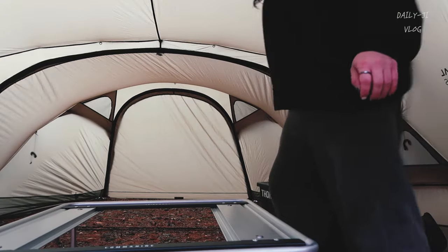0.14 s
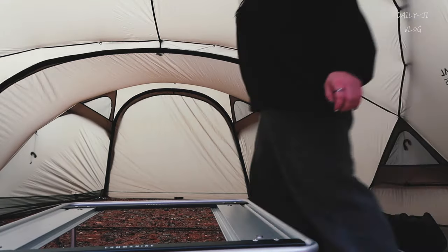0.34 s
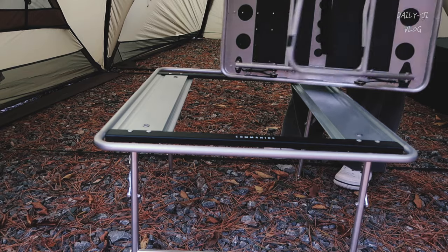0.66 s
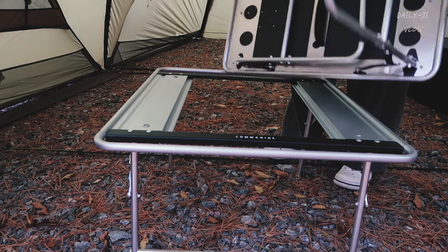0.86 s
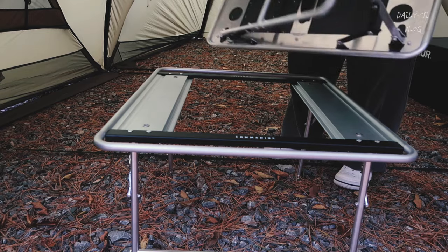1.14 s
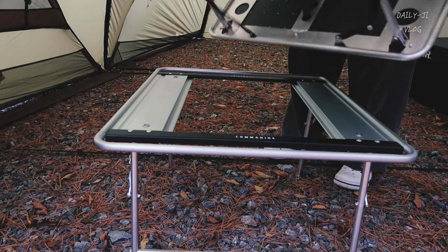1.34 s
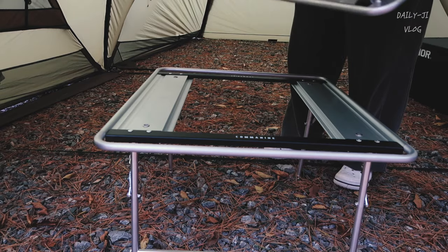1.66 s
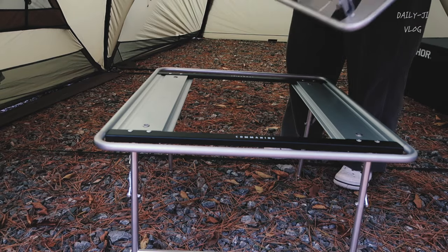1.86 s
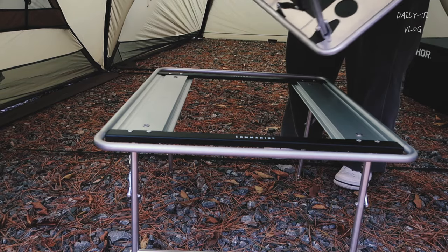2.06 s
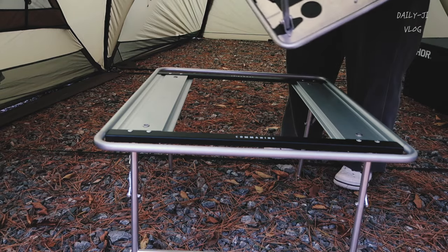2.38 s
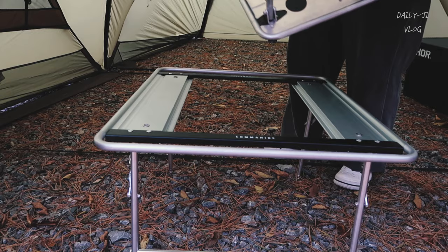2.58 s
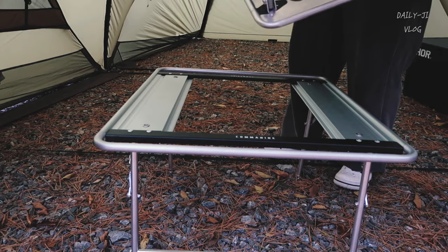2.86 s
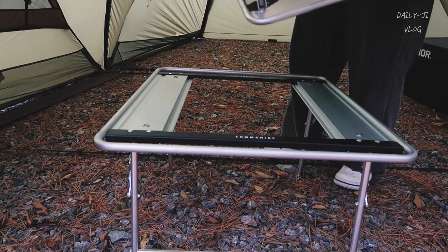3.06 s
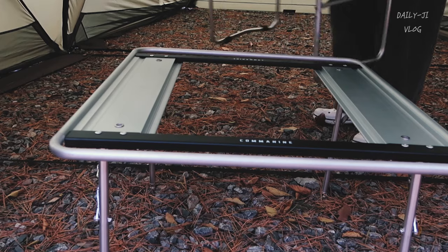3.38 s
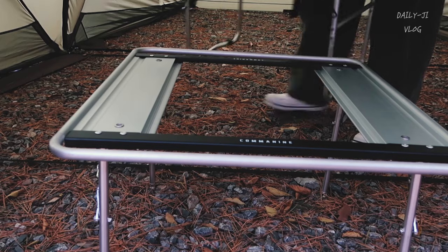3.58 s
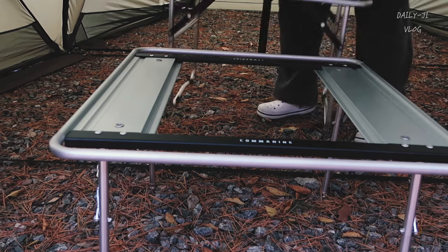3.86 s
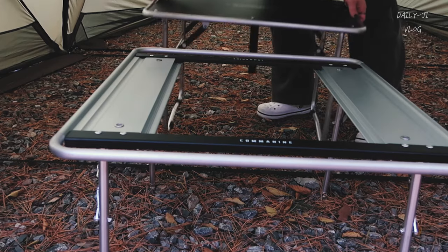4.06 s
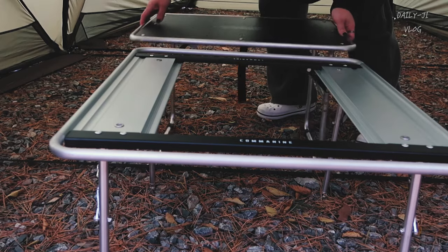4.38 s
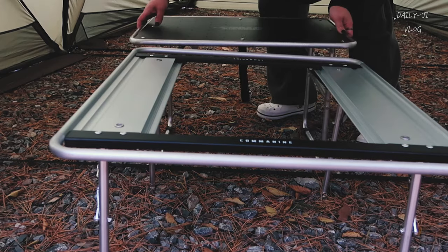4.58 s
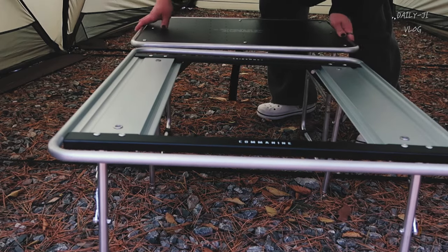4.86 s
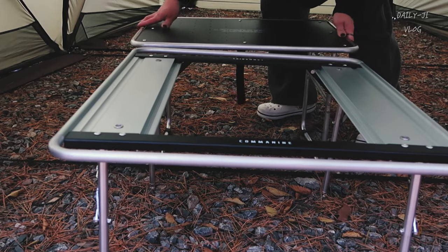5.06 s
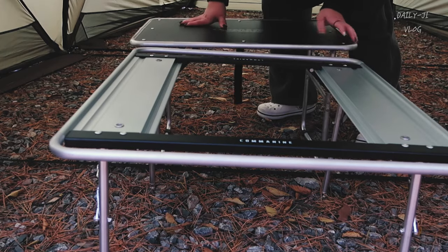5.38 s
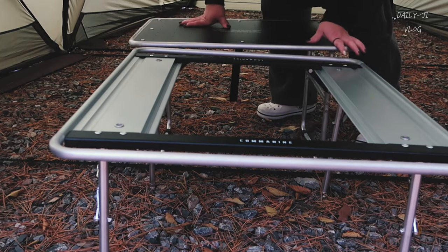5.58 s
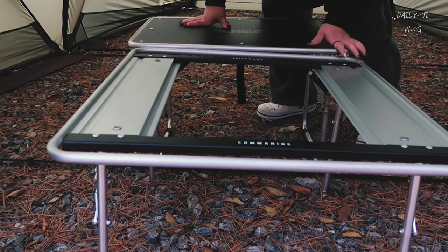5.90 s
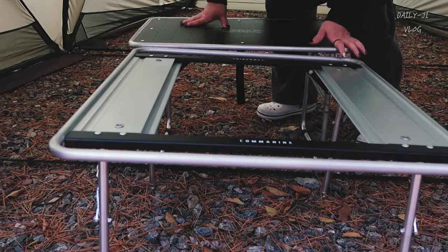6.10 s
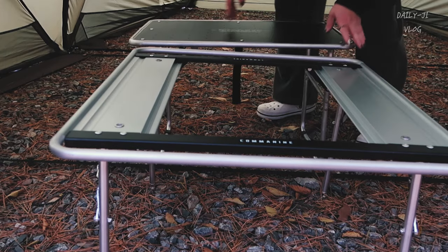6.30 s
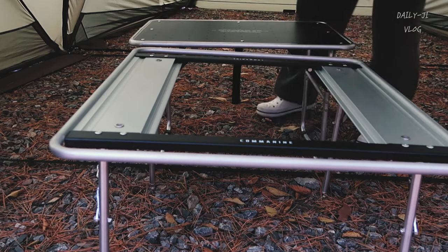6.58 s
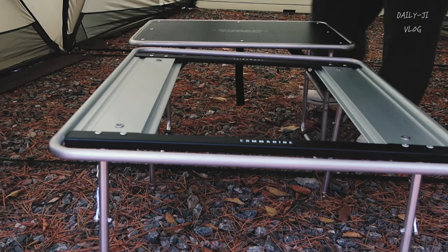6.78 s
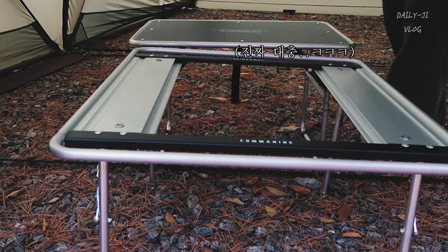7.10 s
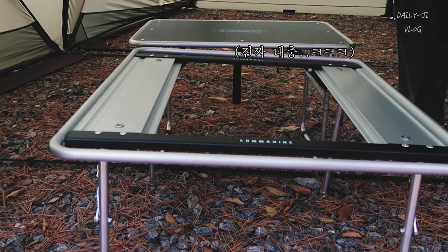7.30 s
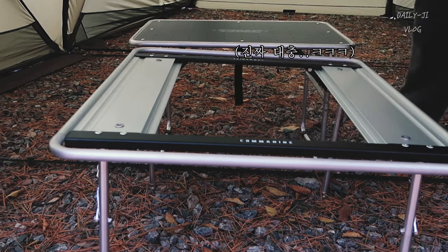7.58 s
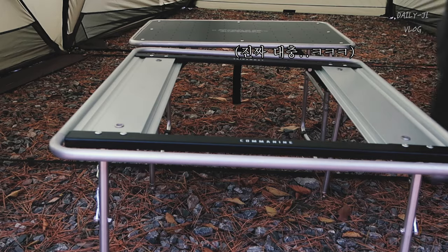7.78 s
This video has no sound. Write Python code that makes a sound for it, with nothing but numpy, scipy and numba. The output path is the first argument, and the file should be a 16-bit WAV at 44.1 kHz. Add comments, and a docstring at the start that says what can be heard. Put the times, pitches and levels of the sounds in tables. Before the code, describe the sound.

A folding aluminium table is set up on gravel inside a tent, close to the microphone, with very little echo. A distant stream rushes softly throughout, and a very faint insect ticks until about 4 seconds. From 0.3 seconds the legs click and clack, and a brace scrapes along its track around 1 second. At 1.5 seconds comes the loudest knock, a rattling metal clack with a low thump, after which everything briefly dips in volume. Following a quieter stretch, shoes and table feet crunch the stones from 3 to 4 seconds among lighter knocks, with another knock near 4.9 seconds. Palms squeak across the top at 5.4 seconds, the frame clacks sharply at 5.9, and a second squeak follows at 6.3. Softer knocks and gravel crunches continue until nearly 8 seconds.

```python
"""A folding aluminium camp table is opened and stood on gravel inside a tent, near a small camera.
A stream rushes throughout, and a far insect ticks for the first half. Legs clack and a brace slides in
its track; at 1.5 s comes the loudest knock, and the camera turns its volume down for a moment.
Shoes and table feet then crunch the stones between more knocks. Palms squeak across the top at 5.4 s,
the frame clacks sharply at 5.9 s, and another squeak, softer knocks and crunches end the scene."""
import sys
import numpy as np
from scipy import signal
from scipy.fft import rfft, irfft, next_fast_len
from scipy.io import wavfile
from scipy.ndimage import uniform_filter1d
from numba import njit

SR = 44100
rng = np.random.default_rng(int(sys.argv[2]) if len(sys.argv) > 2 else 0)


def generate_wav(signal):
    """Clip the signal to [-1, 1] and save it as 16-bit WAV at the path in sys.argv[1]."""
    frames = np.transpose(np.atleast_2d(signal))
    scaled = np.clip(frames, -1, 1) * 32767
    pcm = np.round(scaled).astype(np.int16)
    wavfile.write(sys.argv[1], SR, pcm)


N = 350138


def undb(db):
    return 10 ** (np.asarray(db) / 20)


def unit(x):
    return x / np.sqrt(np.mean(x ** 2))


def peak(x):
    return x / np.max(np.abs(x))


def curve(points, n):
    """Join (Hz, value) points into one value for each frequency of an n-sample spectrum."""
    hz, value = np.transpose(points)
    return np.interp(np.log(np.arange(n // 2 + 1) * SR / n + 1), np.log(hz), value)


@njit
def moving_filter(x, hz, width):
    """Let through the sound near a pitch that may move."""
    y, b, l = np.empty(len(x)), 0., 0.
    for i in range(len(x)):
        g, k = np.tan(np.pi * hz[i] / SR), width / hz[i]
        v = (b + g * (x[i] - l)) / (1 + g * (g + k))
        b, l, y[i] = 2 * v - b, l + 2 * g * v, k * v
    return y


def band(x, hz, width):
    return moving_filter(x, np.clip(hz + np.zeros(len(x)), 20, .45 * SR), max(1. * width, 5.))


def steep_band(x, hz, width):
    return band(band(x, hz, width), hz, width)


def drift(per_s):
    """A smooth random wobble, about 1 in size."""
    k = int(SR / per_s)
    steps = np.repeat(rng.standard_normal(N // k + 1), k)
    return 1.3 * uniform_filter1d(uniform_filter1d(steps, k), k)[:N]


def grit(per_s, spread_db):
    """Many tiny hits of unequal size."""
    size_db = spread_db * np.minimum(rng.exponential(size=N), 3)
    return unit((rng.random(N) < per_s / SR) * rng.standard_normal(N) * undb(size_db))


def swell(s, rise, hold, fall):
    """Samples and gain of a swell that is full at time s; rise and fall are seconds per 20 dB."""
    corners = s + np.array([-3 * rise, 0, hold, hold + 3 * fall])
    span = np.arange(*np.clip(corners[[0, -1]] * SR, 0, N).astype(int))
    return span, undb(np.interp(span / SR, corners, [-60, 0, 0, -60]))


def whine():
    """The camera's electronics give a faint high tone, stronger on the left."""
    # steady tones: (pitch [Hz], base level [dB])
    tones = [(13000, -83), (13025, -83)]
    t = np.arange(N) / SR
    tone = sum(undb(db) * np.sqrt(2) * np.sin(2 * np.pi * hz * t) for hz, db in tones)
    return tone * np.array([[2.6], [-.8]])


def stream(level_db=-43.5):
    """Far rushing water: smooth noise whose lows and highs swell a little, wider in the highs."""
    # the water's tone: (frequency [Hz], level [dB])
    water = [(15, -35), (25, -51), (38, -6.5), (160, 0), (198, -4), (374, -6), (654, -8), (1110, -10),
             (1200, -11.5), (1570, -12.5), (3570, -25), (5760, -36), (13100, -48), (13700, -48),
             (14300, -80)]
    # stereo width: (frequency [Hz], side over middle [dB])
    spread = [(60, -23), (110, -19.5), (200, -11), (380, -8.5), (700, -14.5), (1290, -12), (2380, -8),
              (4400, -0.5), (8120, -0.5), (15000, 10)]
    n = next_fast_len(N)
    colour_db = curve(water, n)
    gains = undb([colour_db, colour_db + curve(spread, n)])
    noise = irfft(rfft(rng.standard_normal((2, n))) * gains, n)[:, :N]
    low = signal.sosfilt(signal.butter(2, 300, fs=SR, output="sos"), noise)
    mid, side = low * undb(.27 * drift(3.14)) + (noise - low) * undb(.7 * drift(2.85))
    return undb(level_db) * np.array([mid + side, mid - side]) / np.std(mid)


def insect(start_s=.085, end_s=4.05, period_s=.12, ticks_s=(0, .013, .04, .067), hz=4180, db=-70):
    """A far insect repeats a short group of dry ticks, opposite in left and right."""
    times = (np.arange(start_s, end_s, period_s)[:, None] + ticks_s).ravel()
    clicks = np.zeros(N)
    clicks[(times * SR).astype(int)] = undb(3.8 * rng.standard_normal(len(times)))
    return undb(db) * unit(steep_band(clicks, hz, 500)) * np.array([[1], [-1]])


def crunch():
    """Gravel and metal grind in dull grains that also ring the legs; needles and dust rustle above."""
    # gritty grinding (gravel underfoot, a leg scraping as it swings, the rough tail of a clack):
    # (time [s], rise [s], hold [s], fall [s], level [dB], pitch [Hz])
    grinds = [(0.303, 0.044, 0.064, 0.088, -40.5, 1490), (0.476, .009, .002, 0.041, -44.5, 2050),
              (0.434, .01, .01, .03, -47.5, 2390), (1.458, 0.028, 0.003, .01, -30.5, 2300),
              (2.3, 0.24, .014, 0.26, -52, 1280), (2.487, .05, 0.12, 0.039, -64, 1220),
              (3.112, 0.068, .01, 0.27, -54, 1280), (3.47, 0.074, .005, 0.17, -41.5, 1610),
              (3.6, 0.079, .005, 0.15, -43.5, 2540), (3.704, 0.019, 0.023, 0.1, -34, 1420),
              (3.774, 0.011, 0.02, 0.03, -37.5, 1360), (3.817, 0.024, .003, 0.021, -36.5, 1530),
              (3.94, 0.14, .01, .03, -54, 1250), (4.424, 0.009, 0.015, 0.07, -39, 2080),
              (4.843, 0.0084, 0.0027, 0.031, -34, 1830), (4.89, .008, 0.013, 0.022, -42, 2900),
              (4.897, 0.021, 0.039, 0.053, -36, 1730), (4.928, .015, 0.015, 0.017, -49, 3080),
              (5.598, 0.16, 0.1, 0.13, -50.5, 1810), (5.938, 0.0096, .003, 0.057, -23.5, 1520),
              (5.952, .01, 0.039, .015, -39, 2880), (5.955, 0.015, 0.013, 0.03, -46, 1410),
              (6.128, .017, .002, 0.021, -43, 1820), (6.435, 0.023, .002, 0.012, -44.5, 1340),
              (6.757, 0.16, .005, 0.22, -46, 1530), (6.91, 0.13, 0.095, 0.12, -56, 1400),
              (7.059, 0.018, 0.033, 0.05, -45, 1240), (7.082, 0.015, 0.026, 0.034, -47, 2030),
              (7.15, 0.064, 0.042, 0.058, -39.5, 1580), (7.536, 0.073, 0.025, 0.05, -42.5, 1370),
              (7.598, 0.039, 0.03, 0.06, -44, 1230), (7.7, .2, .005, 0.077, -47.5, 1180)]
    # dry needles, dust and skin:
    # (time [s], rise [s], hold [s], fall [s], level [dB], fine over coarse dust [dB])
    rustles = [(0.28, .004, .003, 0.018, -53, -11), (0.304, 0.024, 0.021, 0.046, -48, -22),
               (2.3, 0.022, .002, 0.033, -47, -8), (2.338, .05, 0.25, .06, -58, 1),
               (3.24, .006, 0.0022, 0.05, -50, -14), (3.275, .01, .01, .03, -51.5, 8),
               (3.49, 0.16, 0.046, .1, -47, 1), (3.566, .008, 0.03, .03, -38, 5),
               (3.603, 0.03, .004, 0.1, -30, -1.5), (3.697, .006, 0.0089, 0.022, -31, -6),
               (3.705, 0.016, 0.01, 0.051, -18.5, -0.5), (3.745, 0.022, 0.018, 0.086, -26, 1),
               (3.813, 0.006, 0.024, 0.012, -27, -5), (3.87, .02, .01, .02, -45, -4),
               (4.424, 0.01, 0.033, 0.059, -44.5, -3), (4.663, 0.088, .005, .067, -51, -10),
               (4.85, .04, .03, .03, -60, -1), (4.904, .043, .002, .012, -46, -1),
               (5.319, 0.095, 0.13, .06, -31.5, 2.5), (5.594, 0.097, 0.0091, 0.23, -48, -3),
               (5.95, .015, .003, .064, -56, -1), (6.129, 0.0047, 0.0035, 0.008, -30, 0),
               (6.138, .005, .015, .015, -48, -8), (6.19, 0.064, .03, 0.059, -57, -11),
               (6.338, 0.079, 0.0033, 0.043, -27.5, -5), (6.74, 0.0085, .01, .04, -51, -4),
               (6.772, 0.03, .02, 0.071, -40, -5.5), (6.871, 0.0097, 0.014, .04, -45.5, -14),
               (6.916, .012, 0.0072, 0.044, -39.5, 1), (6.954, 0.011, .006, .04, -43, -5),
               (6.998, .03, .01, .03, -45, -4), (7.062, 0.012, 0.032, 0.087, -40.5, -1),
               (7.148, .05, 0.037, 0.04, -44, -12), (7.235, 0.045, 0.017, 0.049, -47.5, -10),
               (7.527, .043, .004, 0.075, -35.5, -3), (7.662, .07, 0.05, .1, -53, -1),
               (7.77, 0.086, .004, 0.14, -45.5, -1)]
    grinding, dust, out = grit(4500, 1.9), grit(9000, 1.3), np.zeros(N)
    flicker = undb(1.8 * drift(40))
    coarse = unit(band(dust, 5700, 6000)) * flicker
    fine = unit(steep_band(dust, 11200, 12000)) * flicker
    uneven = undb(2 * drift(70))
    for s, rise, hold, fall, db, hz in grinds:
        span, gain = swell(s, rise, hold, fall)
        grains = grinding[span]
        dull = unit(steep_band(grains, hz, 1740))
        ringing = undb(-12.5) * unit(band(grains, hz, 160))
        ringing += undb(-12) * unit(band(grains, 1.55 * hz, 320))
        bright = undb(-7) * unit(band(grains, 2490, 1400))
        out[span] += undb(db) * gain * uneven[span] * (dull + ringing + bright)
    for s, rise, hold, fall, db, fine_db in rustles:
        span, gain = swell(s, rise, hold, fall)
        rustle = (undb(-fine_db / 2) * coarse[span] + undb(fine_db / 2) * fine[span]) / 2
        out[span] += undb(db) * gain * rustle
    return out


def palm_rubs():
    """Skin drags on the table top: it squeaks, rasps and makes the metal sheet sing near that pitch."""
    # strokes: (time [s], rise [s], hold [s], fall [s], level [dB], pitch [Hz], glide [octaves/s])
    strokes = [(5.342, 0.11, 0.02, 0.034, -41.5, 3320, 2.5), (5.392, 0.022, 0.024, .03, -42, 2750, 0),
               (5.43, 0.052, .01, .02, -33, 2220, 0), (5.454, 0.02, 0.016, 0.01, -29.5, 1990, -4.5),
               (5.46, 0.023, 0.022, 0.02, -35.5, 3370, -1), (6.29, 0.014, 0.027, 0.05, -37.5, 2230, -1),
               (6.334, 0.022, 0.017, 0.017, -32, 3470, -10.5), (6.343, 0.013, 0.013, 0.036, -41, 4780, -2)]
    # notes of the top under a palm: (pitch [Hz], width [Hz], level [dB])
    sheet_notes = [(1270, 55, -6), (1397, 40, 6.5), (1770, 88, 0), (1980, 58, 3), (2140, 70, 3.5),
                   (2436, 57, 5.5), (2660, 80, 3), (3000, 100, -1), (3450, 64, 1), (3870, 90, -7),
                   (4260, 98, -2), (4500, 99, -6), (4890, 100, -1), (5530, 130, -6)]
    skin, out = grit(15000, 1.4) * undb(1.5 * drift(90)), np.zeros(N)
    for s, rise, hold, fall, db, hz, glide in strokes:
        span, gain = swell(s, rise, hold, fall)
        friction, pitch_hz = skin[span], hz * 2 ** (glide * (span / SR - s))
        sheet = sum(undb(g) * unit(band(friction, f, w)) / (1 + (np.log2(f / hz) / .51) ** 2)
                    for f, w, g in sheet_notes)
        squeak = unit(steep_band(friction, pitch_hz, 330))
        rasp = unit(steep_band(friction, hz, 1800))
        out[span] += undb(db) * gain * (undb(-5) * squeak + undb(.5) * unit(sheet) + undb(-10.5) * rasp)
    return out


def brace_slides(wander=.021):
    """A brace sticks and slips: its track sings with wandering notes, the top hums, the rubbing hisses."""
    # notes of the track: (pitch [Hz], width [Hz], level [dB])
    track_notes = [(1190, 150, -1), (1540, 290, 7.5), (2490, 92, 1), (3310, 110, 11), (3460, 92, 2),
                   (3760, 90, 13.5), (4540, 190, 8.5), (5450, 230, 10), (6240, 150, 2), (7170, 140, -3)]
    # slides: (time [s], rise [s], hold [s], fall [s], track [dB], hum [dB], hiss [dB])
    slides = [(0.531, 0.019, 0.0089, 0.19, -46, -45.5, -76), (0.716, 0.04, 0.047, 0.14, -47.5, -54, -75),
              (0.803, .06, 0.032, .04, -47, -55, -66), (0.909, 0.12, 0.084, 0.097, -28, -40, -40)]
    rub, out = grit(9700, 2.2), np.zeros(N)
    track = sum((-1) ** k * undb(db) * band(rub, hz * (1 + wander * drift(24.24)), width)
                for k, (hz, width, db) in enumerate(track_notes))
    track += undb(2.5) * band(rub, 2450, 3700)
    hum = band(rub, 359, 50) + undb(-6) * band(rub, 507, 67)
    hiss = band(band(rub, 10000, 4000), 15000, 4000)
    layers = np.array([unit(track), unit(hum), unit(hiss)])
    for s, rise, hold, fall, *levels_db in slides:
        span, gain = swell(s, rise, hold, fall)
        out[span] += gain * (undb(levels_db) @ layers[:, span])
    return out


def thumps():
    """The frame jolts with one dull note. A ring time (t60) is the time to fade by 60 dB."""
    # jolts: (time [s], level [dB], pitch [Hz], ring time [s])
    jolts = [(0.542, -15.5, 456, 0.058), (0.619, -27, 470, 0.14), (.85, -28.5, 60, 0.13),
             (1.468, 3, 73, 0.039), (1.474, -12.5, 154, 0.12), (1.487, -8, 111, 0.069),
             (3.704, -22, 250, 0.046), (3.8137, -11, 327, 0.027), (3.819, -24, 390, 0.04),
             (3.813, -13, 169, 0.024), (4.903, -26, 405, 0.04), (4.904, -28, 126, 0.09)]
    out, t = np.zeros(N), np.arange(SR // 6) / SR
    for s, db, hz, t60 in jolts:
        envelope = 1000 ** (-t / t60) * (1 - np.exp(-t * hz / 2.54))
        out[int(s * SR):][:len(t)] += undb(db) * np.sin(2 * np.pi * hz * t) * envelope
    return out[:N]


def ring(notes, gain, stretch, t):
    """Struck metal rings and fades; loose joints split each note into a close, wavering pair."""
    hz, db, t60 = np.transpose(notes)[:, :, None]
    detune, strength, sign, twin_detune = rng.standard_normal((4, len(hz), 1))
    tone = np.sin(2 * np.pi * hz * (1 + .012 * detune) * t)
    tone += .8 * np.sin(2 * np.pi * hz * (1 + .02 * twin_detune) * t)
    decay = 1000 ** (-t / (stretch * np.clip(t60, .02, 170 / hz)))
    return peak(np.sum(gain * undb(.5 * db + 2 * strength) * np.sign(sign) * tone * decay, axis=0))


def knocks(chatter_share=.046, first_touch=1.1, buzz_depth=.45):
    """Each knock on the frame cracks, chatters briefly, rattles, and rings the tubes and the top."""
    # knocks: (time [s], level [dB], pitch [Hz], thud [dB], tick [dB], ring time [s], width [octaves])
    hits = [(0.36, -19, 1740, -18, -38, 0.03, 0.75), (0.4717, -24, 2550, -26, -32, 0.047, 1.3),
            (0.5279, -25.5, 1130, -17, -39, 0.21, 0.35), (0.5278, -24.5, 1880, -14, -37, 0.14, 0.2),
            (.5275, -32, 3150, -22, -37, 0.087, .2), (.543, -13.5, 4140, -6, -7, 0.024, 1.1),
            (0.547, -23.5, 3440, -12, -18, 0.08, 0.11), (.549, -25, 1000, -1.5, -9, 0.11, 1.7),
            (0.6181, -28.5, 1360, -6, -15, 0.14, 0.17), (.734, -10, 1460, -7.5, -5, 0.02, 3.9),
            (0.843, -12, 2100, -20, -46, 0.05, 0.81), (0.8447, -8.5, 1930, -20.5, -40, 0.086, 0.7),
            (0.848, -18, 2500, -17, -40, 0.11, 0.85), (.8575, -16, 2600, -20, -40, 0.092, .9),
            (0.9297, -9, 2780, -16.5, -30, 0.0048, 1.6), (1.078, -17.5, 1710, -19, -30, 0.03, 2.6),
            (1.143, -13, 3340, -24.5, -30, 0.06, 1.9), (1.239, -16.5, 2350, -28, -27, 0.11, 3.2),
            (1.3949, -4, 1730, -24.5, -33, 0.045, 4.3), (1.4626, -4, 3370, -18, 5, 0.1, 1.4),
            (1.466, 5.5, 2120, -12, -16, 0.054, 1.07), (1.4814, 6, 3400, -16, -22, 0.025, 1.5),
            (1.485, -3, 2500, -12, -20, 0.033, 1.2), (1.498, 4.5, 2930, -14.5, -12, 0.036, 1),
            (1.5148, -1.5, 3080, -14.5, -19, 0.03, 0.75), (1.521, -13, 3180, -20, -20, 0.032, 0.37),
            (1.5343, -9.5, 2860, -11.5, -7, 0.028, 1.8), (3.168, -27, 1440, -19, -34, 0.044, 1.1),
            (3.1912, -27.5, 1500, -14, -34, 0.043, 1.3), (3.2414, -16.5, 2400, -16, -26, 0.025, 1.3),
            (3.245, -26, 2160, -13, -25, .05, 0.87), (3.428, -29, 1360, -17, -30, 0.026, 0.71),
            (3.476, -21, 1980, -14, -15, 0.034, 1.1), (3.604, -30, 4000, -28, -8, 0.031, 1.5),
            (3.68, -41, 3300, -23, -20, .015, .9), (3.6839, -22, 3530, -26, 8, 0.014, 0.5),
            (3.6872, -15, 5800, -30, -4, .012, 1), (3.7057, -17.5, 1430, -11, -12, 0.06, 1.3),
            (3.7102, -19.5, 1420, -15, -16, 0.056, 0.79), (3.711, -14.5, 3600, -27, 0, 0.086, 2.1),
            (3.734, -27, 1150, -7, -17, 0.052, 0.67), (3.7393, -25, 1050, -9, -17, 0.031, 0.96),
            (3.736, -19, 3700, -16, -17, 0.08, .5), (3.7738, -22, 1000, -11, -20, 0.025, 1.1),
            (3.813, -14, 1410, -7, -7, 0.016, 0.85), (3.818, -15.5, 2650, -21, -3, 0.033, 1.2),
            (3.826, -24, 2300, -24, -20, 0.084, 0.46), (3.899, -29.5, 1820, -28, -19, 0.064, 2.4),
            (4.8378, -22, 2220, -16, -32, .06, 1.1), (4.8473, -25, 1900, -5, -34, 0.033, 0.68),
            (4.9018, -16, 2790, -6, -40, 0.068, 0.3), (4.9046, -17.5, 1900, -16, -30, 0.062, 1),
            (4.9081, -21.5, 2900, -6.5, -30, 0.12, 0.31), (5.65, -25, 1780, -13, -27, 0.03, 2.8),
            (5.868, -36, 2480, -10, -44, 0.057, 0.77), (5.9318, -9, 920, -28, -40, 0.036, 0.65),
            (5.9329, -2.5, 2870, -26, -32, 0.04, 0.33), (5.9333, -3.5, 1625, -31, -32, 0.04, 0.37),
            (5.936, -2.5, 2880, -30, -32, 0.036, 0.38), (5.9394, -1.5, 1590, -30, -39, 0.052, 0.46),
            (5.948, -16.5, 3050, -20, -30, 0.11, .25), (5.962, -23.5, 1540, -25, -30, 0.091, 0.3),
            (5.978, -21, 3070, -6, -25, 0.088, .35), (6.038, -31, 2560, -8, -37, 0.11, 0.39),
            (6.1265, -32, 3500, -24, -11, .015, 2), (6.1292, -23.5, 3000, -29, -6, 0.024, 2.3),
            (6.736, -30.5, 3500, -28, -17, 0.025, 1.4), (6.838, -26.5, 1870, -6, -28, 0.016, 1.6),
            (7.026, -29.5, 1350, -23, -26, 0.068, 2), (7.055, -31.5, 1220, -23, -26, 0.076, 0.56),
            (7.0683, -21, 1310, -18, -20, 0.013, 1.2), (7.075, -29, 1200, -24, -26, .04, .5),
            (7.085, -30, 2090, -17, -26, 0.044, 0.31), (7.116, -30, 1800, -20, -24, .03, .8),
            (7.149, -28, 1500, -9.5, -17, 0.052, 1.2), (7.189, -30, 1700, -12, -20, 0.028, 1.4),
            (7.4981, -34, 1250, -12, -27, 0.025, .6), (7.558, -27.5, 1310, -9, -25, .03, 0.84),
            (7.578, -32, 1310, -6, -25, 0.045, 0.53), (7.608, -31.5, 1240, -10, -25, .04, 0.47),
            (7.619, -31, 1000, -6, -25, 0.025, .9)]
    # notes of the frame: (pitch [Hz], weight [dB, halved in use], base ring time [s])
    frame_notes = [(1128, 6.5, 0.068), (1312, -21, 0.11), (1569, -8, 0.12), (1688, -1, .1),
                   (1950, -13, 0.065), (2102, 8, 0.046), (2458, -1.5, 0.052), (2870, 15, 0.022),
                   (3074, 7.5, 0.1), (3166, -7, 0.27), (3280, -10, 0.09), (3470, -6, 0.019), (4160, 3, 0.1),
                   (4920, 7, 0.3), (4850, -8, 0.4), (5530, -19, 0.32), (5500, -6, 0.056),
                   (7000, -42, 0.053)]
    # notes of the top panel: (pitch [Hz], weight [dB, halved in use], base ring time [s])
    panel_notes = [(231, -2.5, 0.16), (300.5, -8, 0.22), (464.5, 2.5, 0.23), (571, 1.5, 0.25),
                   (644, -10, 0.17), (798, 9, 0.075), (968, 1.5, 0.21)]
    frame_hz = np.array(frame_notes)[:, :1]
    out, longest = np.zeros(N + SR), np.arange(SR // 6) / SR
    for s, db, hz, thud_db, tick_db, t60, octaves in hits:
        t = longest[:int((.02 + 2.5 * t60) * SR)]
        noise = rng.standard_normal((5, len(longest)))[:, :len(t)]
        chatter = noise[0, :512] ** 3 * np.exp(-(t[:512] / (chatter_share * t60)) ** 2)
        chatter /= np.sqrt(np.sum(chatter ** 2))
        chatter[0] = first_touch
        width_hz = hz * (2 ** (octaves / 2) - 2 ** (-octaves / 2))
        crack = peak(steep_band(np.pad(chatter, (0, len(t) - 512)), hz, .68 * width_hz))
        join = 1 - np.exp(-t / .002)  # loose parts take a moment to join in
        rattle = peak(band(noise[1], hz, .23 * width_hz) * 1000 ** (-t / t60) * join)
        nearness = 1 / (1 + (np.log2(frame_hz / hz) / (1.8 * octaves)) ** 2) ** 2
        buzz = 1 + buzz_depth * unit(band(noise[4], 235, 144))  # loose joints roughen the ring
        tubes = peak(np.convolve(ring(frame_notes, nearness, t60 / .05, t) * buzz, chatter)[:len(t)])
        tubes *= undb(3.5 - 8 * octaves)  # a broad crack is a glancing blow and rings the tubes less
        thud = ring(panel_notes, 1, t60 / .088, t)
        thud += .41 * peak(steep_band(noise[2], 740, 800) * 1000 ** (-t / (4 * t60)))
        tick = peak(band(noise[3], 10200, 15600) * 1000 ** (-t / (1.5 * t60)) * join)
        knock = crack + undb(-7) * rattle + tubes + undb(thud_db) * thud + undb(tick_db) * tick
        out[int(s * SR):][:len(t)] += undb(db) * knock
    # cut the low boom from the knocks; the thumps supply the bass
    return signal.sosfilt(signal.butter(3, 190, "high", fs=SR, output="sos"), out)[:N]


def tent(x, t60=.15, mid_db=-13, side_db=-1.5):
    """Cloth walls add a short echo to the middle (what left and right share) and side (the rest)."""
    t = np.arange(SR // 4) / SR
    tails = rng.standard_normal((2, len(t))) * 1000 ** (-t / t60) * (t > .003)
    tails /= np.sqrt(np.sum(tails ** 2, axis=1, keepdims=True))
    echo = signal.fftconvolve(x[None], tails, axes=1)[:, :N]
    return x * [[1], [.5]] + undb([[mid_db], [side_db]]) * echo


def microphones(mid_side):
    """Two close microphones hear the lows alike and the highs out of step."""
    # tone of both together: (frequency [Hz], gain [dB])
    response = [(25, -6), (55, 7.5), (8000, -7), (9800, -13.5), (11500, -14), (13500, -15.5), (15500, -36)]
    # stereo width of near sounds: (frequency [Hz], side gain [dB])
    spread = [(60, -29), (200, -17), (700, -21), (2400, -19), (4400, -8), (8100, 0), (9800, 8), (12000, 4),
              (15000, 5)]
    n = next_fast_len(N + SR)
    mid, side = rfft(mid_side, n) * undb(curve(response, n))
    mid = irfft(mid, n)[:N]
    side = irfft(-1j * side * undb(curve(spread, n)), n)[:N]  # -1j shifts it a quarter cycle
    return np.array([mid + side, mid - side])


def scene():
    """The table and gravel sound inside the tent, over the steady background."""
    near = knocks() + thumps() + brace_slides() + crunch() + palm_rubs()
    return microphones(tent(near)) + stream() + insect() + whine()


@njit
def duck(level, limit, attack_s, release_s):
    """A gain that drops fast when the level passes the limit, then creeps back."""
    gain, g = np.empty(len(level)), 1.
    for i in range(len(level)):
        want = min(1., limit / (level[i] + 1e-9))
        g += (want - g) / (SR * (attack_s if want < g else release_s))
        gain[i] = g
    return gain


def record(dry):
    """The camera turns down on loud knocks, clips the tallest peaks and cuts the highest treble."""
    level = np.sqrt(uniform_filter1d(np.mean(dry ** 2, axis=0), size=400) + 1e-12)
    gain = duck(level, limit=float(undb(-19)), attack_s=.014, release_s=.45)
    treble_cut = signal.ellip(12, .2, 95, 15750, fs=SR, output="sos")
    return signal.sosfilt(treble_cut, np.clip(dry * gain, -.9, .9))


dry = scene()
out = record(dry)
generate_wav(out)
```